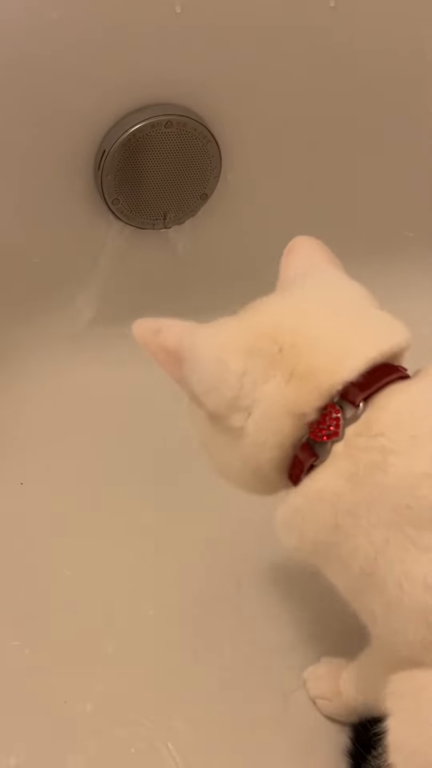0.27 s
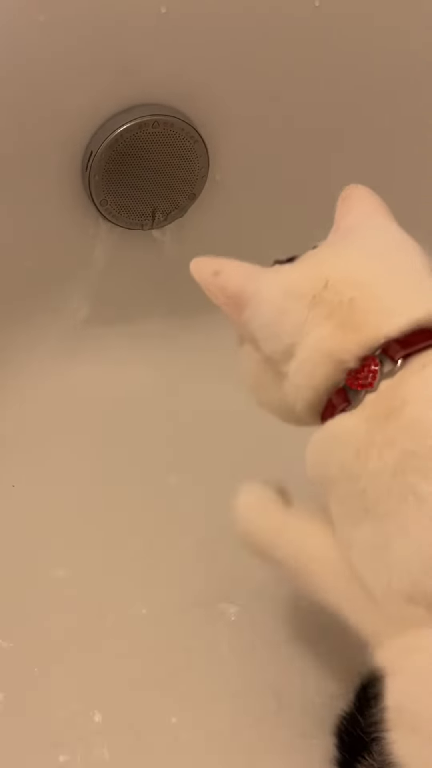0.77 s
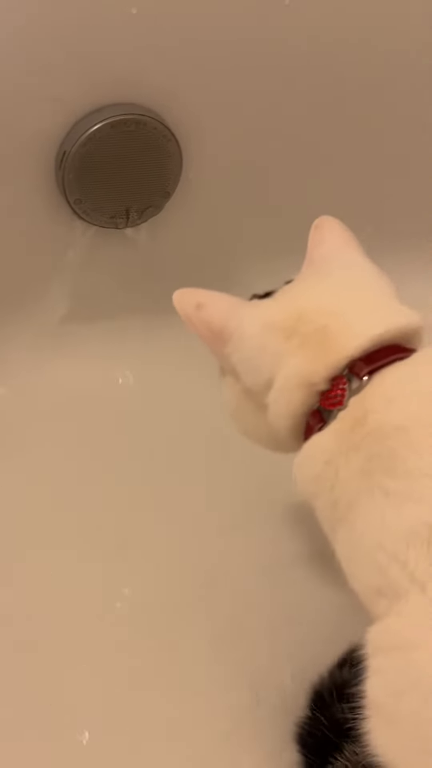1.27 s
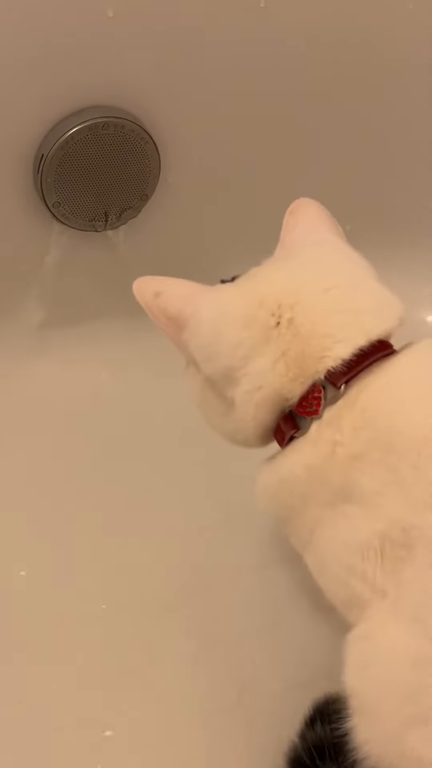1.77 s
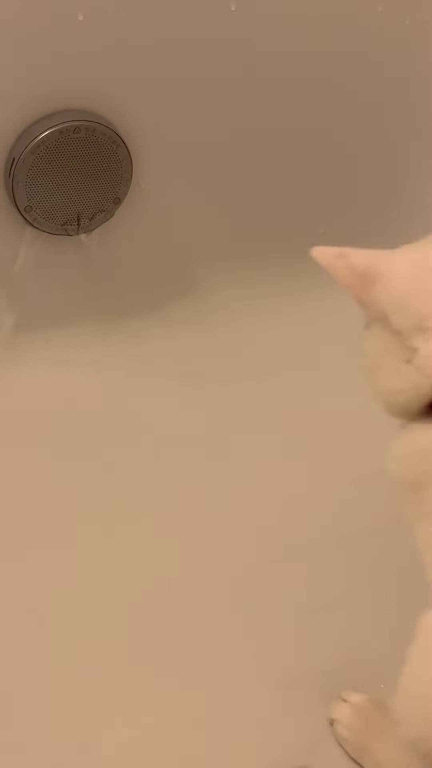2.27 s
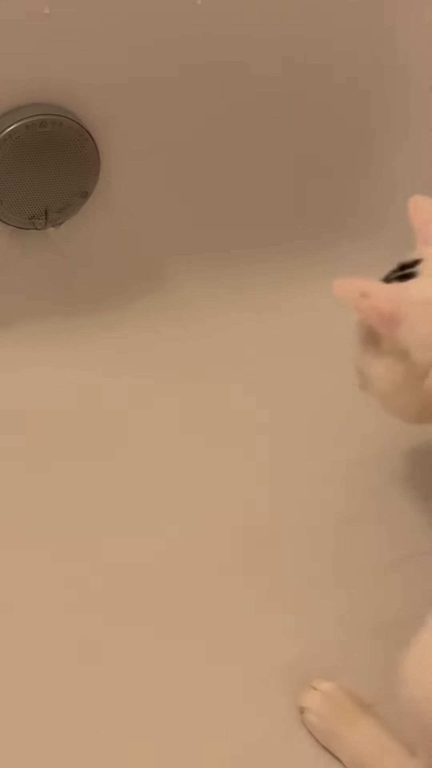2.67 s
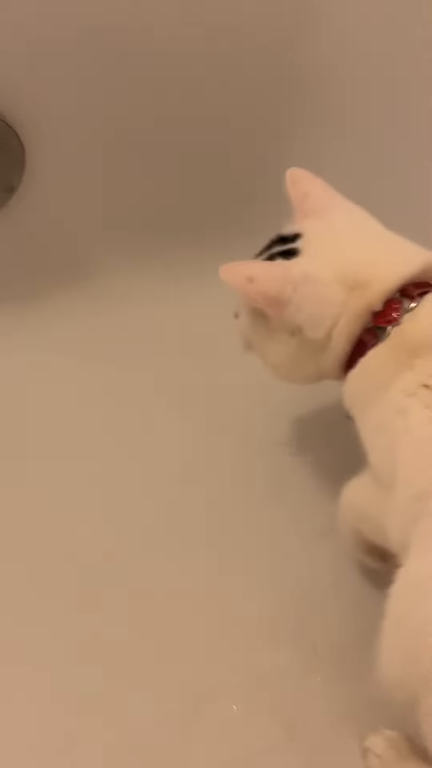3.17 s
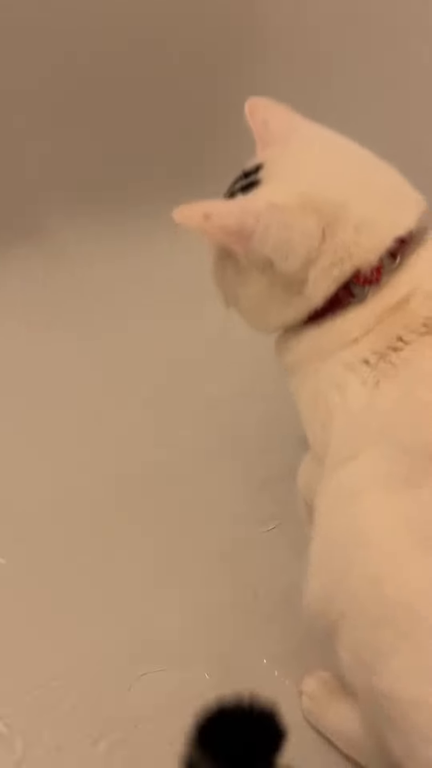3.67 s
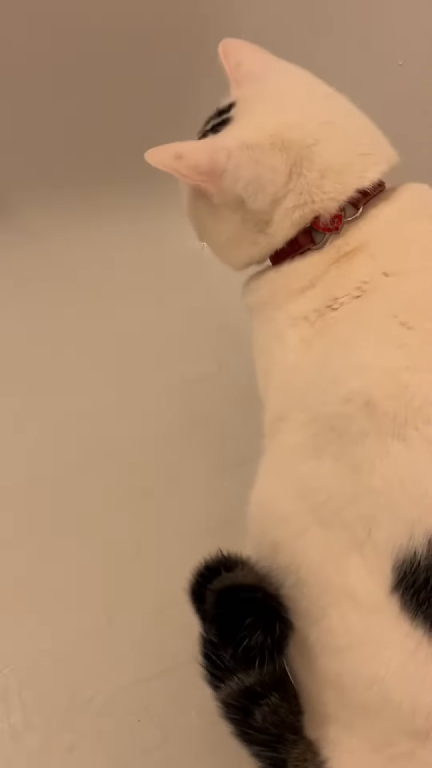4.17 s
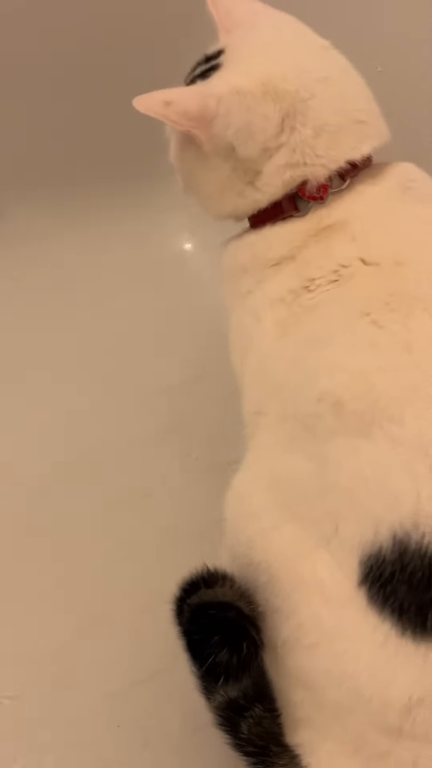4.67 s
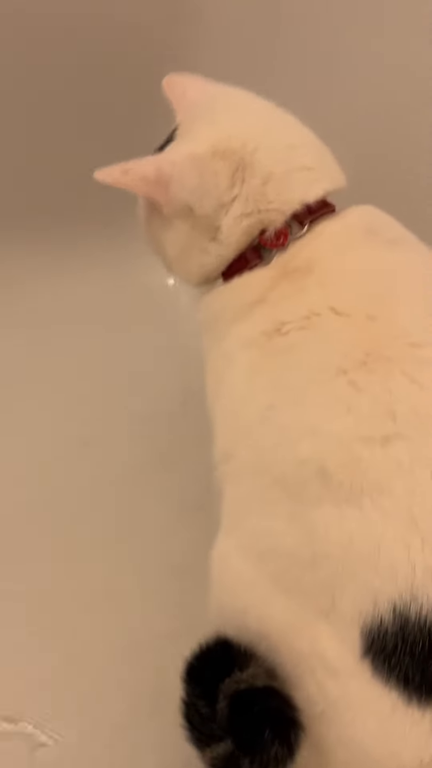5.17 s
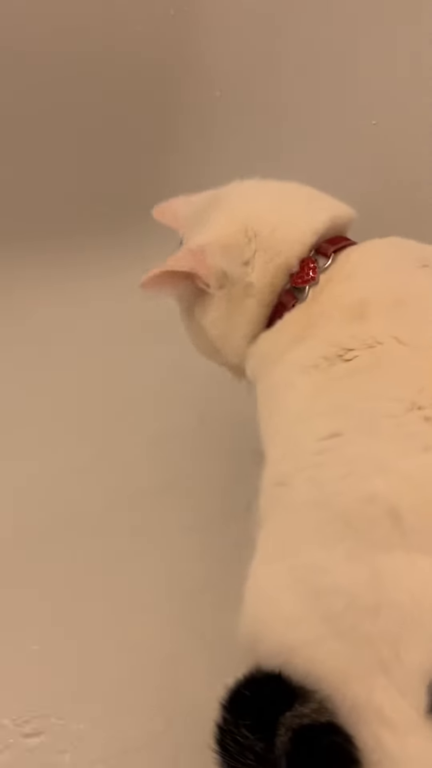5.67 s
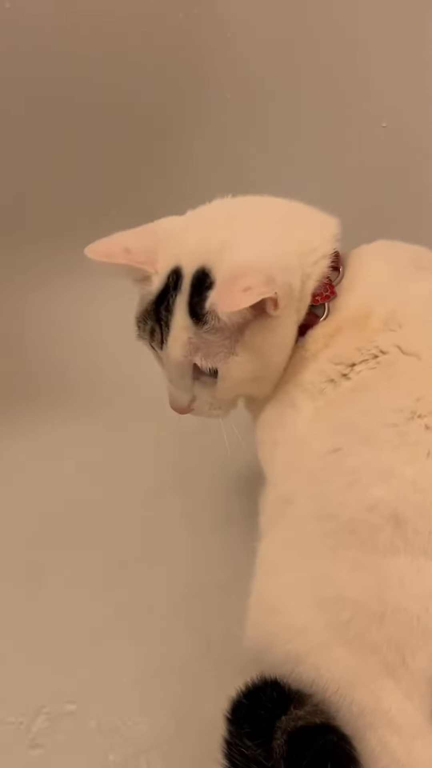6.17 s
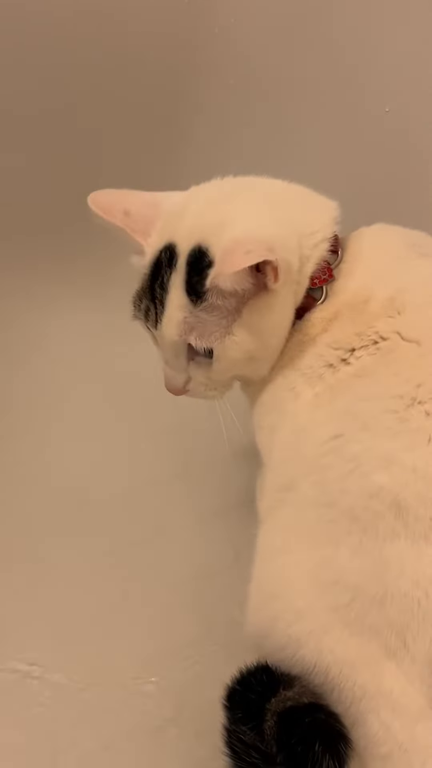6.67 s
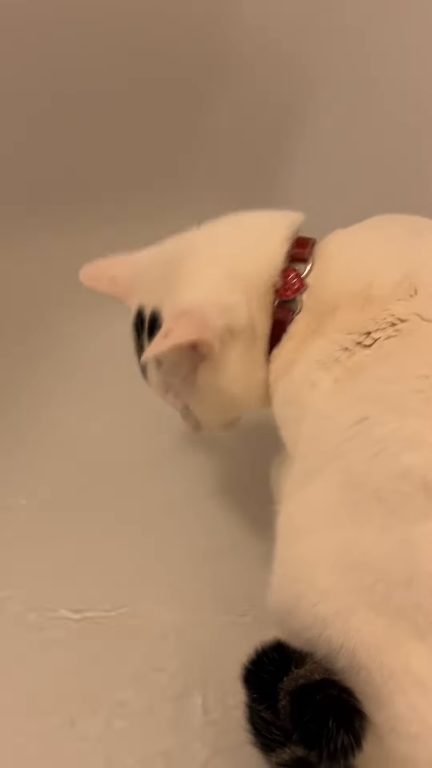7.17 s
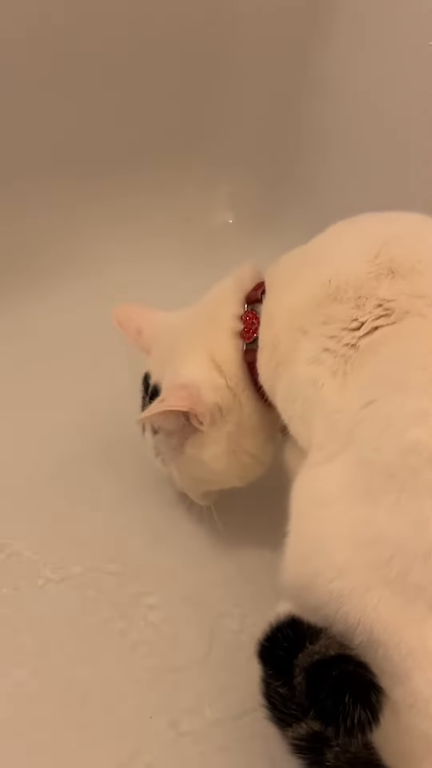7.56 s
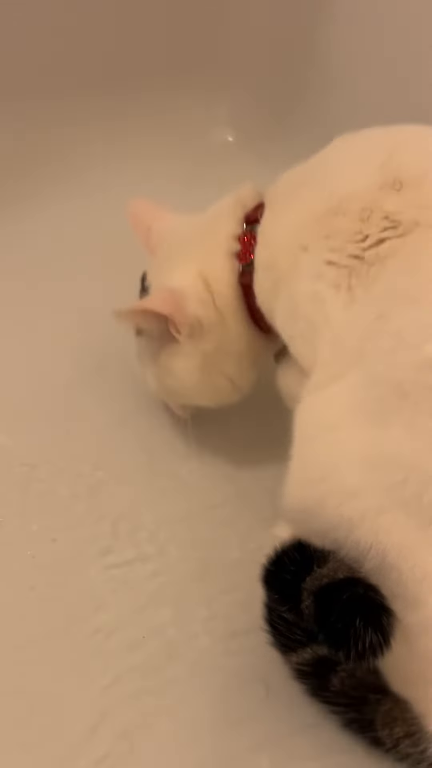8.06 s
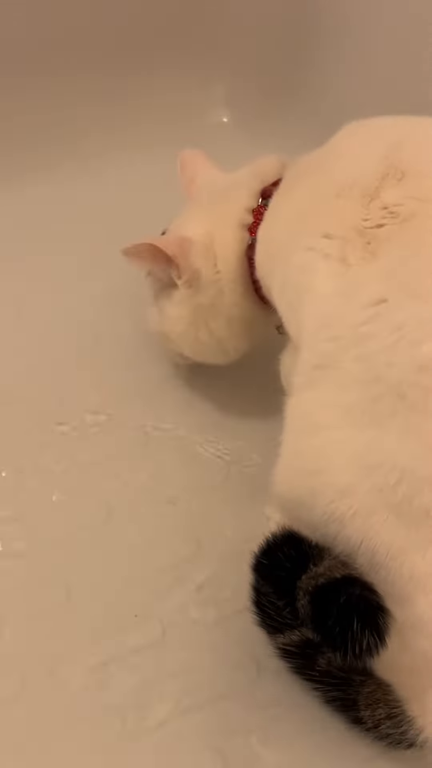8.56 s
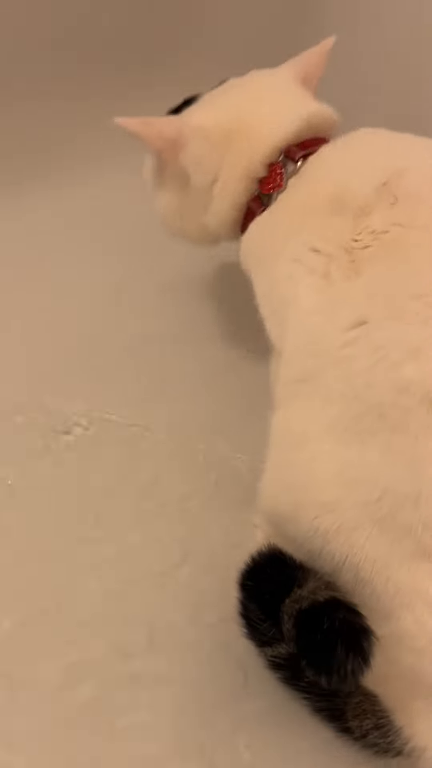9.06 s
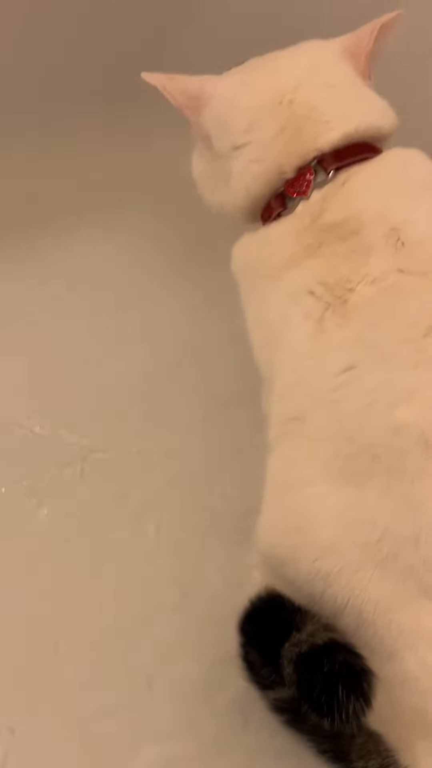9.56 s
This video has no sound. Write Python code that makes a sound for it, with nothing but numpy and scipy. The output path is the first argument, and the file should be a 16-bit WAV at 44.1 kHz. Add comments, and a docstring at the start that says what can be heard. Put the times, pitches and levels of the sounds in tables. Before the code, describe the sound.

A low pump hum with a soft rumble runs throughout, pulsing slowly. From the start, a thin trickle and scattered small drops tick and plink quietly into a bathtub. At about 2.6 seconds the flow begins to swell, and by 3.4 seconds it is a much louder stream. Water and air gurgle through the outlet in quick, uneven gushes, with wet slaps, sharp droplet ticks and a fizzing spray of small bubbles. Soft, dull thuds land on the tub floor between 3 and 3.6 seconds and again between 6 and 6.5 seconds. The gurgling grows a little stronger in the second half. Around 8.9 seconds a cat's small collar bell gives a brief, very high tinkle. The water is still running at the end, near 10 seconds. Everything is heard close up in stereo, with a short echo from the hard tub walls.

```python
"""Bathtub starting to fill

Close to a bathtub, on a stereo microphone. A thin trickle of drops grows into a stream: slugs
of water and air gurgle through the outlet, ring its air spaces and thud on the tub floor in a spray
of small bubbles. A pump hums underneath, its rotor beating against the mains. Near the end a cat's
collar bell tinkles."""
import sys
import numpy as np
from scipy import signal
from scipy.fft import rfft, irfft, next_fast_len
from scipy.io import wavfile
from scipy.ndimage import uniform_filter1d, map_coordinates

SR = 44100
rng = np.random.default_rng(int(sys.argv[2]) if len(sys.argv) > 2 else 0)


def dump_mix(stems):
    """Bounce the given channels to the path in sys.argv[1] as a 16-bit WAV at rate SR."""
    frames = np.atleast_2d(stems).T  # one column per channel
    limited = np.clip(frames, -1, 1)  # hard clip at full scale
    pcm = np.round(limited * 32767).astype(np.int16)
    wavfile.write(sys.argv[1], SR, pcm)


N = 432180


def amp(db):
    """Decibels to amplitude."""
    return 10 ** (np.asarray(db) / 20)


def unit(x):
    """x scaled to an RMS of one."""
    return x / np.sqrt(np.mean(x ** 2) + 1e-20)


def along(points, hz):
    """Values between (Hz, value) points on a log frequency axis."""
    point_hz, values = np.transpose(points)
    return np.interp(np.log(hz + 1), np.log(point_hz + 1), values)


def curve(points):
    """One value per sample between (s, value) points."""
    return np.interp(np.arange(N) / SR, *np.transpose(points))


def wobble(rate):
    """A smooth random curve, rate knots a second."""
    return map_coordinates(rng.standard_normal(int(N * rate / SR) + 4), [np.arange(N) * rate / SR])


def filtered(x, response):
    """x through a complex response, given as a function of Hz."""
    padded = next_fast_len(N + SR // 2)
    return irfft(rfft(x, padded) * response(np.fft.rfftfreq(padded, 1 / SR)), padded)[..., :N]


def bursts(start_s, size, t60, rise_s=0.00052):
    """An envelope that swells within a moment at each start and dies fast."""
    kicks = np.bincount((start_s * SR).astype(int), size, N)[:N]
    decays = signal.lfilter([1], [1, -amp(-60 / SR / t60)], kicks)
    soft = np.exp(-1 / SR / rise_s)
    return signal.lfilter([1 - soft], [1, -soft], decays)


def bubbles(start_s, size, hz, cycles, glide, samples=192):
    """Air pockets ring a few cycles, their pitch rising as they reach the surface."""
    turns = np.arange(samples) / SR * hz[:, None]
    age = turns / cycles
    ring = np.sin(2 * np.pi * turns * (1 + glide * age)) * age * np.exp(1 - 2 * age)
    at = (start_s * SR).astype(int)[:, None] + np.arange(samples)
    return np.bincount(at.ravel(), (size[:, None] * ring).ravel(), N + SR)[:N]


def pump():
    """The rotor slips a little behind the mains, so the two hums beat over a broad rumble."""
    # magnetic hum: multiple, level_db
    mains_partials = [(1, -36), (2, -60.5), (3, -45.5), (6, -68.5)]
    # rotor hum: multiple, level_db
    rotor_partials = [(1, -40.5), (2, -54), (5, -64)]
    # the rotor's wavering: time_s, pitch_hz
    rotor_pitch = [(0, 97.3), (1.7, 97.2), (2.6, 97.3), (3.6, 97.39), (4.6, 97.31), (9, 97.3), (9.8, 97.22)]
    # slow swell of both hums: time_s, gain_db
    hum_gain = [(0, -2.5), (9.8, 0)]
    # spectrum of pump and room air: frequency_hz, density_db
    rumble_colour = [(20, -34), (36, -5), (45, -11), (85, 3.5), (125, -7.5), (230, -15.5), (330, -8.5),
                     (450, -18.5), (750, -19.5), (1050, -21.5), (1450, -27), (1800, -25.5), (2500, -30),
                     (4500, -39), (16000, -48)]
    # faint narrow tones in the rumble: pitch_hz, strength_db
    rumble_tones = [(460, 6.5), (535, 5), (620, 6), (688, 3.5), (940, 2)]
    mains_hz, in_step_s = 99.985, 0.09  # both hums swing together at in_step_s
    mains_phase = 2 * np.pi * mains_hz * (np.arange(N) / SR - in_step_s)
    rotor_phase = 2 * np.pi * (np.cumsum(curve(rotor_pitch)) / SR - rotor_pitch[0][1] * in_step_s)
    hum = sum(amp(db + 0.6 * wobble(3)) * np.sin(k * mains_phase) for k, db in mains_partials)
    hum += sum(amp(db + 2.4 * wobble(3.3)) * np.sin(k * rotor_phase + 0.21 * wobble(4))
               for k, db in rotor_partials)
    peaks = lambda f: 1 + sum(amp(db) / (1 + ((f - hz) / 8) ** 2) for hz, db in rumble_tones)
    rumble = filtered(rng.standard_normal(N), lambda f: amp(along(rumble_colour, f)) * peaks(f))
    return amp(curve(hum_gain)) * np.sqrt(2) * hum + amp(-45) * unit(rumble)


def collar_bell():
    """The pellet of a small bell touches its shell; each touch rings two modes in its own balance."""
    # shell modes: pitch_hz, t60_s
    modes = [(8825, 0.18), (10178, 0.15)]
    # pellet touches: start_s, low_mode_db, high_mode_db
    touches = [(8.862, -32, -58), (8.881, -31.5, -56), (8.965, -56, -38)]
    tinkle, t = np.zeros(N + SR), np.arange(SR // 4) / SR
    for start_s, *levels_db in touches:
        ring = sum(amp(db - 60 * t / t60) * np.sin(2 * np.pi * hz * t)
                   for (hz, t60), db in zip(modes, levels_db))
        tinkle[round(start_s * SR):][:len(t)] += ring * (1 - np.exp(-t / 0.0034))
    return tinkle[:N]


def tub_walls(x, t60):
    """The tub's hard walls answer with a dense tail, which colours the middle range."""
    t = np.arange(SR // 4) / SR
    tail = rng.standard_normal(len(t)) * amp(-60 * t / t60)
    echoes = signal.fftconvolve(x, tail / np.linalg.norm(tail))[:N]
    return filtered(echoes, lambda f: 1 / (1 + (420 / (f + 1)) ** 8) / (1 + (f / 7000) ** 2))


def scatter(x, t60):
    """Moving water scatters the sound: ever new echoes that carry its energy and fade."""
    hop = 64
    frames = dict(nperseg=256, noverlap=256 - hop)
    spectrum = signal.stft(x, **frames)[2]
    left = amp(-120 * hop / SR / t60)  # share of energy left after one hop
    energy = signal.lfilter([1 - left], [1, -left], abs(spectrum) ** 2, axis=1)
    noise = signal.stft(rng.standard_normal(N), **frames)[2]
    echoes = np.sqrt(energy) * noise / np.sqrt(np.mean(abs(noise) ** 2))
    return signal.istft(echoes, **frames)[1][:N]


def trickle(count=1500, span_s=2.9):
    """Small bubbles near three sizes, and loud drops: each a tick of impact, a bubble, some spatter."""
    # thin water before the stream: time_s, level_db
    thin_flow = [(0, -47), (.6, -63), (2.4, -57), (2.6, -58), (2.9, -92)]
    # the loudest drops: start_s, level_db, pitch_hz
    drops = [(0.0405, -28.5, 2580), (0.058, -39, 1960), (0.071, -42, 2110), (0.1004, -40, 10500),
             (0.155, -41, 10000), (0.184, -40, 3380), (0.358, -38.5, 8000), (0.511, -43, 3480),
             (0.544, -38, 5100), (0.582, -40, 3400), (0.6315, -45, 4360), (0.7407, -40, 8600),
             (0.84, -38.5, 3300), (0.859, -35.5, 3560), (1.1095, -41, 9600), (1.185, -44, 3620),
             (1.338, -43, 8500), (1.6, -40, 2800), (1.844, -38, 9000), (1.975, -42, 2750),
             (2.2105, -39, 9500), (2.6344, -39, 5200), (2.684, -36, 3500), (2.697, -34.5, 3550)]
    start_s, db, hz = np.transpose(drops)
    soft_below_hz = 6000  # drops pitched below this land softer
    when, kind, size, life = rng.random((count, 4)).T
    pitch_hz = np.array([3400, 5900, 10000])[np.digitize(kind, [0.4, 0.7])]
    pitch_hz = pitch_hz * amp(2 * rng.standard_normal(count))
    strength = amp(17.2 * size ** 3) * np.clip(pitch_hz / soft_below_hz, 0, 0.7)
    cycles = 0.73 + 4.8 * life[:, None] ** 3
    thin = bubbles(when * span_s, strength, pitch_hz, cycles, glide=0.0098, samples=320)
    runoff = bursts(start_s, amp(-53 + 0.2 * (db - db.mean())), t60=0.44)  # drops set water running
    thin *= amp(curve(thin_flow)) + runoff
    drop_cycles = np.where(hz < soft_below_hz, 3.5, 2.1)[:, None]
    ring = bubbles(start_s - 0.0008, amp(db + 7.5), hz, drop_cycles, glide=0.011, samples=640)
    impact_db = db + 10 * np.log10(np.clip(hz / soft_below_hz, 0, 1))
    tick = bursts(start_s, amp(impact_db + 1), t60=0.0044, rise_s=0.0001)
    spatter = bursts(start_s, amp(impact_db - 3), t60=0.06)
    wet_band = lambda f: f ** 2 / (f ** 2 + 2400 ** 2) / (1 + (f / 6000) ** 2)
    return thin + ring + filtered(rng.standard_normal(N) * (tick + spatter), wet_band)


def floor_thuds(t60=0.31):
    """Heavy slugs of water land on the tub floor with dull bursts of noise."""
    # landings: start_s, level_db
    landings = [(3.09, -47), (3.191, -45), (3.588, -44.5), (6.15, -43), (6.459, -43.5)]
    envelope, t = np.zeros(N + SR), np.arange(SR // 5) / SR
    for start_s, db in landings:
        envelope[round(start_s * SR):][:len(t)] += amp(db - 60 * t / t60) * (1 - np.exp(-t / 0.0011))
    dull_band = lambda f: f ** 2 / (f ** 2 + 450 ** 2) / (1 + (f / 1500) ** 4)
    return amp(18) * filtered(envelope[:N] * rng.standard_normal(N), dull_band)


def droplet_snaps():
    """Single droplets hit the tub, each a brief flick of treble."""
    # bright droplets: start_s, level_db
    droplets = [(2.792, -29), (3.2561, -27), (3.4641, -19), (3.522, -18), (3.756, -21), (3.8243, -21),
                (4.0703, -27), (4.791, -25), (7.2306, -19), (7.24, -17), (8.3733, -21)]
    start_s, db = np.transpose(droplets)
    flicks = rng.standard_normal(N) * bursts(start_s, amp(db + 5), t60=0.008, rise_s=0.0001)
    return filtered(flicks, lambda f: 1 / (1 + (7000 / (f + 1)) ** 4) / (1 + (f / 12000) ** 2))


def stream_levels():
    """Levels in dB of gurgle, break-up and spray: each gush sets in fast, sags and is cut off."""
    # the steady stream, swelling as the tap opens: time_s, level_db
    flow = [(0, -84), (2.3, -68), (2.55, -58), (2.7, -52), (2.9, -48), (3.1, -43), (3.34, -38.5),
            (4.83, -39.5), (6.58, -39), (7.08, -38), (7.4, -40), (8.2, -38.5), (9.8, -39.5)]
    # spells of full outlet flow: start_s, length_s, level_db
    gushes = [(3.403, 0.062, -38), (3.578, 0.032, -33), (3.657, 0.16, -40), (3.949, 0.044, -35),
              (4.067, 0.1, -31.5), (4.308, 0.07, -37), (4.387, 0.086, -33), (4.498, 0.028, -34),
              (4.603, 0.057, -33), (4.752, 0.033, -31), (4.81, 0.11, -30), (4.96, 0.15, -33),
              (5.179, 0.085, -39), (5.302, 0.028, -29.5), (5.351, 0.035, -32.5), (5.442, 0.14, -30.5),
              (5.627, 0.06, -35), (5.835, 0.17, -30.5), (6.157, 0.041, -32), (6.285, 0.064, -34.5),
              (6.423, 0.12, -36.5), (6.681, 0.14, -33.5), (6.84, 0.047, -36), (6.903, 0.11, -30.5),
              (7.056, 0.406, -32.5), (7.563, 0.25, -30), (7.9, 0.033, -29), (8.006, 0.33, -32.5),
              (8.367, 0.082, -29.5), (8.495, 0.15, -33), (8.677, 0.059, -35), (8.842, 0.29, -32.5),
              (9.193, 0.11, -30), (9.33, 0.036, -30), (9.382, 0.079, -32.5), (9.507, 0.11, -36.5),
              (9.652, 0.055, -28.5)]
    rise_s, sag_db_per_s, fall_db_per_s = 0.012, 13.5, 344
    flow_db = curve(flow)
    lull_db = flow_db - 6  # gurgle between gushes
    gush = np.zeros(N)
    for start_s, length_s, db in gushes:
        t = np.arange(N) / SR - start_s
        fade_db = sag_db_per_s * (t - length_s / 2) + fall_db_per_s * np.maximum(t - length_s, 0)
        gush = np.maximum(gush, amp(db - fade_db) * np.clip(t / rise_s, 0, 1))
    swell_db = 20 * np.log10(np.hypot(1, gush / amp(lull_db)))
    breakup_db = flow_db + 0.78 * swell_db
    # a weak flow sprays less, and the fine spray hardly swells with a gush
    spray_db = flow_db + 0.1 * (flow_db - np.median(flow_db)) + 0.1 * swell_db
    return lull_db + swell_db, breakup_db, spray_db


def spray(level_db, surge, count=9000):
    """Clumps of small bubbles fizz over a fine hiss, both surging with the stream."""
    # spectrum of the spray: frequency_hz, density_db
    spray_colour = [(600, -14.5), (1500, -16), (2500, -3.5), (4000, -3.5), (5200, -2.5), (7000, -6.5),
                    (9000, -9), (12000, -15), (16000, -19.5)]
    colour = lambda f: amp(along(spray_colour, f))
    when, pitch, size, life = rng.random((count, 4)).T
    bunching = np.tanh([wobble(14), wobble(14)])  # large and small bubbles bunch apart
    clumps = bunching[np.round(pitch).astype(int), (when * N).astype(int)]
    fizz = bubbles(when * N / SR, amp(10 * size ** 3 + 3.6 * clumps), 2600 * amp(14.5 * pitch),
                   cycles=1.8 + 6.3 * life[:, None] ** 2, glide=0.0055)
    fizz = filtered(fizz * amp(2.3 * surge), lambda f: colour(f) * (f / 4000) ** 0.36)
    hiss = filtered(rng.standard_normal(N) * amp(1.25 * surge), colour)
    return amp(level_db + 3.5) * (0.59 * unit(fizz) + 0.5 * unit(hiss))


def resonance(f, centre_hz, width_hz):
    """Complex band-pass response of one damped mode."""
    return 1j * f * width_hz / (centre_hz ** 2 - f ** 2 + 1j * f * width_hz)


def spout(f):
    """Response of the outlet's air spaces; little passes below the lowest."""
    # air spaces: pitch_hz, width_hz, gain_db
    air_spaces = [(1333, 130, -11), (1506, 93, -6.5), (1750, 220, -11), (2055, 97, 0.75), (2346, 95, 2),
                  (2640, 51, -0.5), (2910, 410, -9.5)]
    modes = sum((-1) ** k * amp(db) * resonance(f, hz, width_hz)
                for k, (hz, width_hz, db) in enumerate(air_spaces))
    return modes / (1 + (1150 / (f + 1)) ** 6)


def gurgle(level_db, breakup_db, surge, count=2400):
    """Slugs of water and air slap through the outlet, ring its air spaces and spatter as they break."""
    # loudest slugs at the outlet: start_s, level_db, relative_spatter_db
    slugs = [(2.965, -36, 9), (3.001, -34.5, 5), (3.137, -35, 5), (3.231, -32, 3), (3.33, -25, 5.5),
             (3.407, -24, -24), (3.432, -22, -0.5), (3.573, -24, 5), (3.672, -22.5, -21), (3.7234, -23, -1),
             (3.805, -25, -1), (3.853, -27, -2), (4.203, -22, -17), (4.3022, -17.5, -9),
             (4.3368, -16.5, -16), (4.3945, -18.5, -9), (4.511, -18.5, -21), (4.5805, -20, -9),
             (4.6576, -22, -11), (4.815, -23.5, -25), (5.214, -20, -23), (5.843, -23.5, -23),
             (5.89, -19.5, -4.5), (6.1605, -27, 2), (6.188, -15.5, -13), (6.2986, -15.5, -13),
             (6.3464, -24, -19), (6.459, -18, -9), (6.6886, -20, -13), (6.717, -15, -6.5),
             (6.853, -19, -7.5), (6.925, -19, 0), (6.9892, -20.5, -19), (7.065, -19, -6),
             (7.135, -19.5, -17), (7.172, -22, 1.5), (7.328, -16, -5), (7.415, -18.5, -17),
             (7.44, -21, -26), (7.569, -22, -16), (7.945, -14.5, -12), (8.0247, -16, -22),
             (8.134, -13.5, -9), (8.159, -17, -7), (8.181, -27, -1), (8.299, -17, -9.5),
             (8.327, -20.5, -21), (8.5026, -17, -21), (8.6812, -24, -3), (8.724, -27, 2.5),
             (8.843, -19, -22), (9.066, -12.5, -12), (9.203, -16, -16), (9.3304, -18.5, -13),
             (9.7062, -13.5, -17), (9.7686, -18.5, -21)]
    slug_s, slug_db, spatter_db = np.transpose(slugs)
    pocket_hz = 2196  # middle pitch of the air pockets that the outlet gulps
    when, size, splash = rng.random((count, 3)).T
    gulp_s = when * N / SR
    patter = bursts(gulp_s, amp(15.3 * size ** 3), t60=0.019, rise_s=0.0019) + 0.2
    patter /= uniform_filter1d(patter, size=SR // 20)  # only the fast flutter stays
    plips = bubbles(gulp_s, amp(14 * size ** 3), pocket_hz * amp(1.25 * (splash - 0.5)),
                    cycles=1.9, glide=0.016, samples=400)
    wash = unit(filtered(rng.standard_normal(N) * patter * amp(0.41 * surge), spout))
    stream = amp(level_db - 4) * (wash + 0.55 * unit(filtered(plips, spout)))

    # a slug that spatters much rings the outlet less
    slap_envelope = bursts(slug_s, amp(slug_db + 6 - 0.5 * spatter_db), t60=0.019, rise_s=0.00094)
    slaps = rng.standard_normal(N) * slap_envelope
    slug_hz = pocket_hz * amp(0.3 * rng.standard_normal(len(slug_s)))
    slaps += bubbles(slug_s, amp(slug_db - 3.5 - 0.41 * spatter_db), slug_hz,
                     cycles=3.7, glide=0.011, samples=600)
    outlet = stream + filtered(slaps, spout)

    splashes = bursts(rng.random(count) * N / SR, amp(14.4 * splash ** 5), t60=0.031)
    breakup = amp(breakup_db + 0.6) * unit(splashes * patter ** 0.35)
    breakup += bursts(slug_s, amp(slug_db + spatter_db + 9.5), t60=0.016, rise_s=0.0008)
    cracks = bubbles(slug_s, amp(slug_db + spatter_db + 11), 1.8 * slug_hz, cycles=1.7, glide=0.01)

    deep = filtered(outlet, lambda f: 1 / (1 + (f / 1800) ** 12))
    deep_gain = amp(4.2 * np.tanh(wobble(22)) - 2.5)  # only some slugs ring the larger spaces
    outlet += (deep_gain - 1) * deep
    spatter = rng.standard_normal(N) * breakup + cracks
    return outlet + filtered(spatter, lambda f: resonance(f, centre_hz=4350, width_hz=3000) ** 2)


def stereo_image(near):
    """Left and right differ in likeness and phase, so each band sounds narrow or wide."""
    # how alike left and right sound in each band: frequency_hz, likeness
    likeness = [(320, 1), (500, .75), (900, .4), (1500, .85), (2400, .96), (5000, .88), (5700, 1),
                (6300, 1), (7300, .75), (8400, 1), (9500, 1), (10700, .65), (11800, 1), (14700, 1)]
    # phase between left and right, bands heard alternately centred and wide: frequency_hz, phase_rad
    phase_gap = [(60, 0), (150, -.1), (300, -.35), (690, -.8), (1030, -1.5), (1290, -.1), (1810, -.1),
                 (2760, 2.3), (3880, .5), (4820, 1.3), (5600, 3.1), (6700, 3.25), (8350, 6.28), (9560, 6.3),
                 (10300, 6.7), (11700, 9.42), (13600, 9.45), (14700, 12.56)]
    angle = lambda f: np.arccos(np.clip(along(likeness, f), 0, 1)) / 2
    shared, apart = filtered(near, lambda f: np.array([np.cos(angle(f)), np.sin(angle(f))]))
    scattered = scatter(apart, t60=0.054)
    pair = np.array([shared + scattered, shared - scattered])
    return filtered(pair, lambda f: np.exp(0.5j * np.outer([1, -1], along(phase_gap, f))))


def scene():
    """Water in the tub, its echo, the pump and the bell, all heard in stereo."""
    gurgle_db, breakup_db, spray_db = stream_levels()
    surge = 2 * np.tanh(0.61 * wobble(40))  # shared by gurgle and spray
    water = gurgle(gurgle_db, breakup_db, surge) + spray(spray_db, surge)
    water += trickle() + floor_thuds() + droplet_snaps()
    return stereo_image(pump() + water + amp(-4) * tub_walls(water, t60=0.12) + collar_bell())


def record(dry):
    """Nothing is kept above the band limit."""
    top_hz = 15800
    return filtered(dry, lambda f: f < top_hz)


dry = scene()
out = record(dry)
dump_mix(out)
```